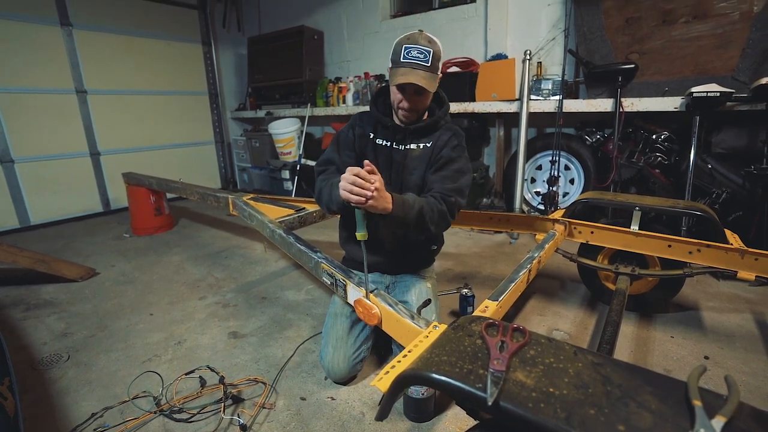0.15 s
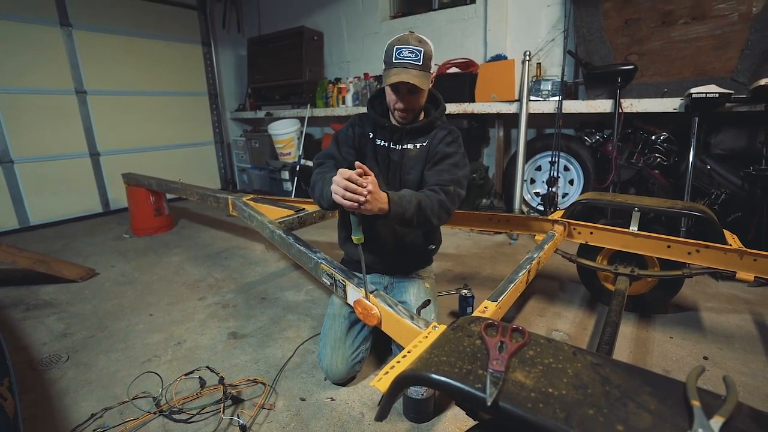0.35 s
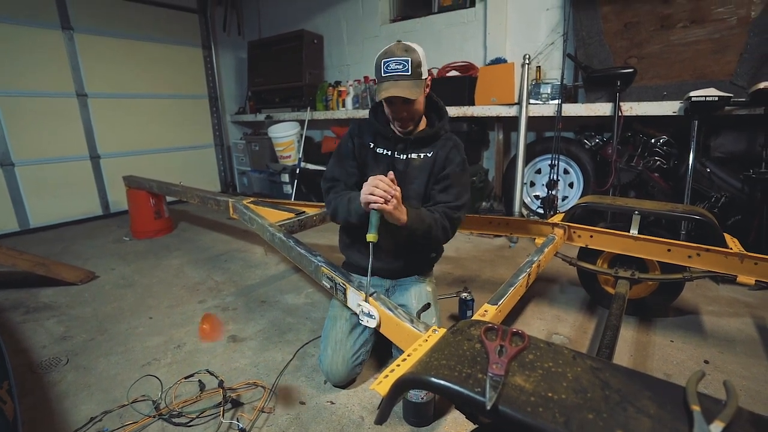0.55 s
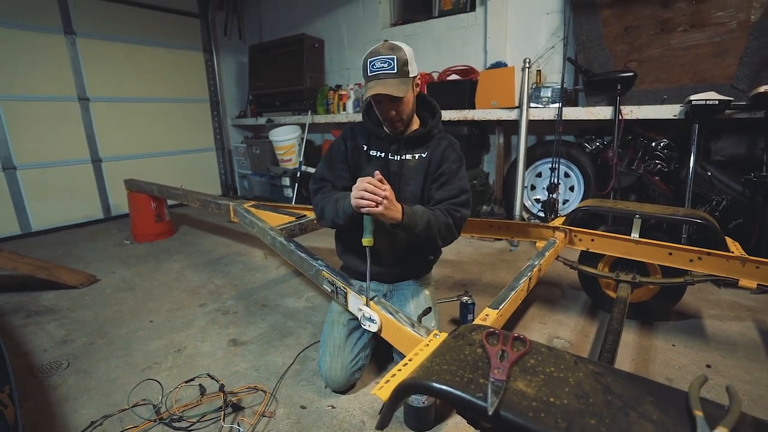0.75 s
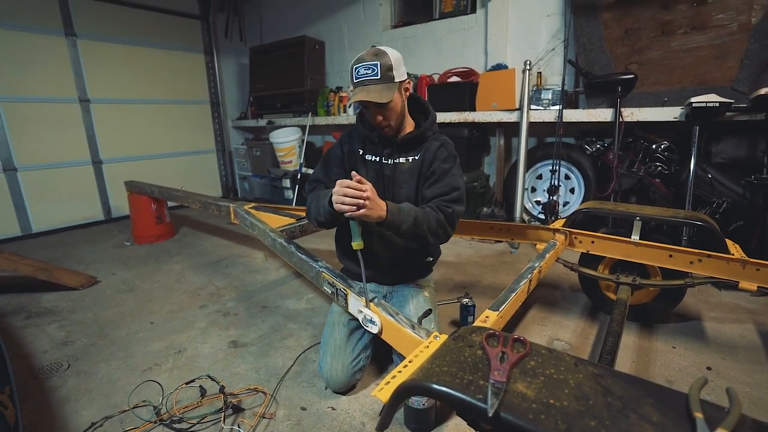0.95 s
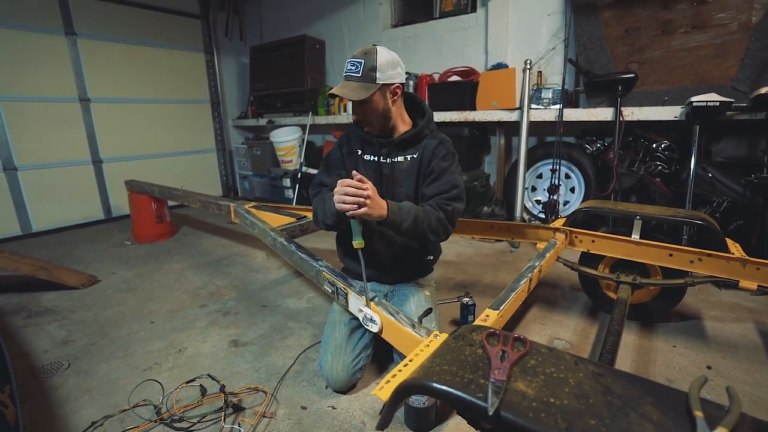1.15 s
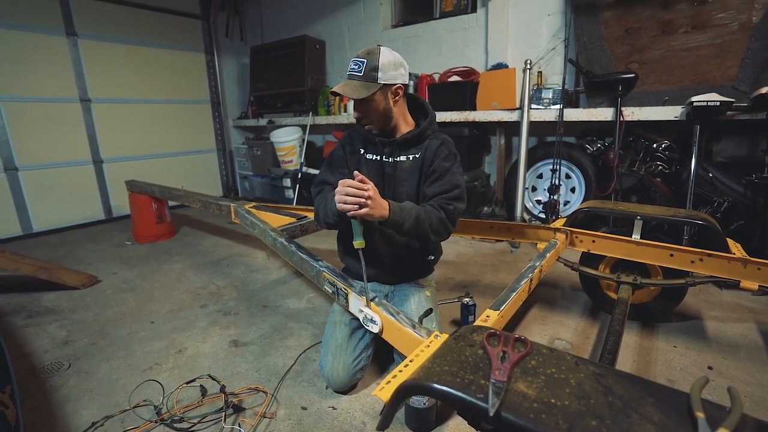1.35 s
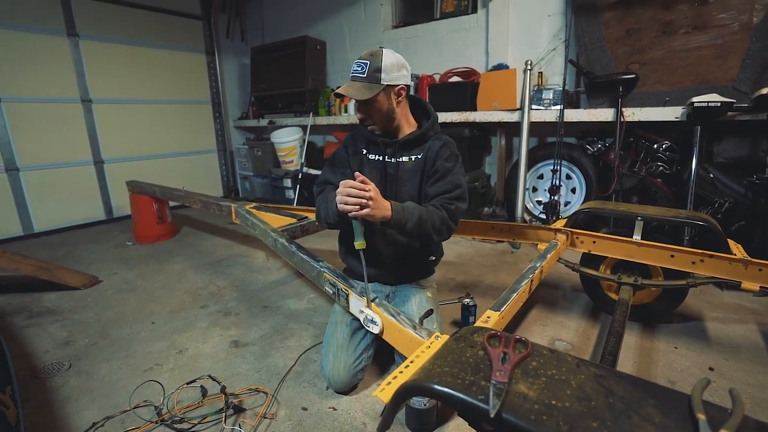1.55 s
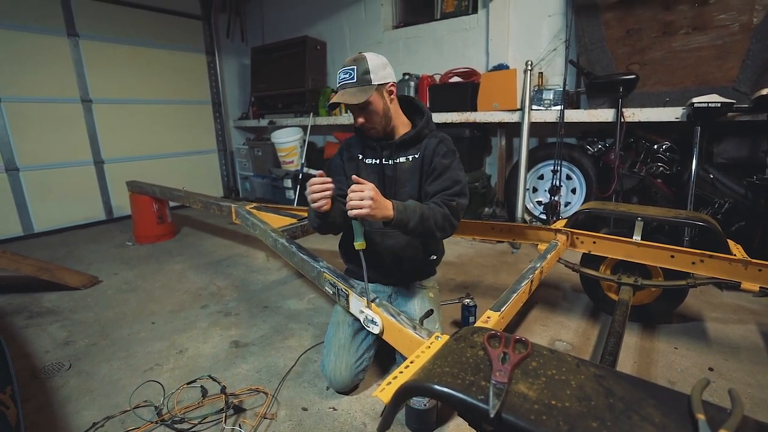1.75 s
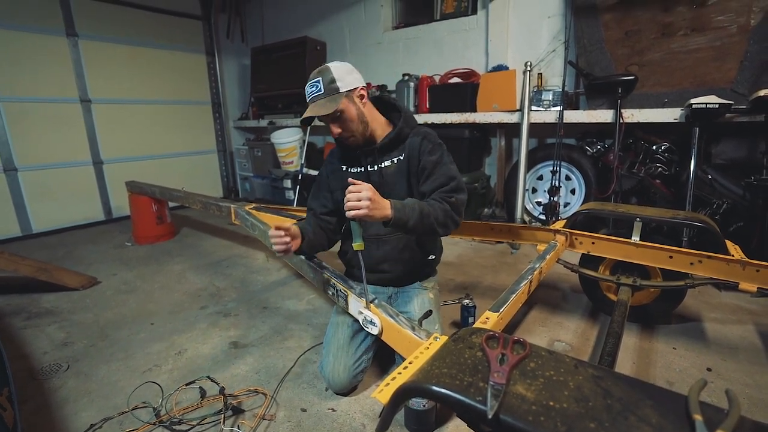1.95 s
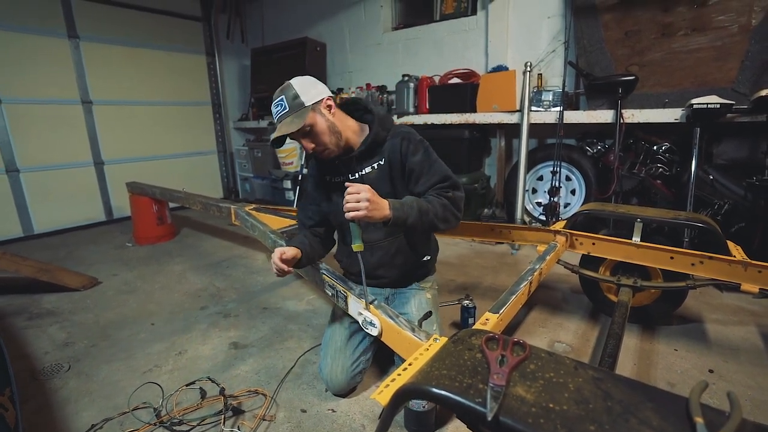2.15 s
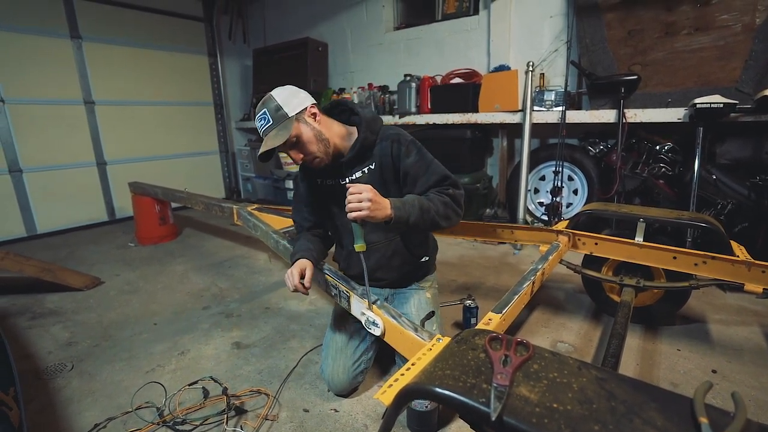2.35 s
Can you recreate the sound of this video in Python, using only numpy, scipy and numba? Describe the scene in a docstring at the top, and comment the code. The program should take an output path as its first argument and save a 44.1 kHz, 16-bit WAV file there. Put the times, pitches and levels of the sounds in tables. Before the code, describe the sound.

Plastic cracks as it is pried off ringing steel, then clatters and rolls on concrete.

```python
"""In a garage, a screwdriver levers a plastic lamp lens off a steel trailer frame.
First the lens cracks and scrapes in its seat, then it snaps free, and each crack makes the steel ring.
Next it clatters onto the concrete and rolls away on its rim, rasping over grit and clinking.
Last, someone shifts with two soft bumps and a sleeve rustles.
All along, the hard room echoes over a faint rumble, and a limiter flattens the loud blows."""
import sys
import numpy as np
from scipy import signal
from scipy.fft import rfft, irfft
from scipy.io import wavfile
from numba import njit

SR = 44100
rng = np.random.default_rng(int(sys.argv[2]) if len(sys.argv) > 2 else 0)


def store_pcm(level_fs):
    """Save levels as 16-bit WAV."""
    pcm = np.round(np.clip(level_fs, -1, 1) * 32767).astype(np.int16)
    wavfile.write(sys.argv[1], SR, np.atleast_2d(pcm).T)


N = 109544

# Cracks of the lens (time [s], level [dB], bass [dB], treble [dB], frame ring [dB],
# snap pitch [Hz], snap level [dB], pitch near which the frame rings most [Hz])
CRACKS = [(.0045, 6.5, -7.5, -7, -16.5, 1750, 11.5, 1500), (0.0247, 6, 3, -4.5, -13.5, 7500, 7, 750),
          (.2185, 3, -4, -9, -16, 1610, -10, 1200), (0.2617, 4.5, 0.5, -5.5, -16, 3700, 4.5, 1000),
          (0.262, -10.5, -1, -4, -21.5, 7600, 0, 1400), (.4882, -1, -1.5, -10.5, -13.5, 1750, -3.5, 1230),
          (0.496, -11.5, 0, 2, -39, 8100, -13, 800), (.527, 3, 3.5, -4, -5, 600, 7.5, 990),
          (0.5289, -25, -1, -4, -23, 2260, 7.5, 2500)]
# Tone of a crack (frequency [Hz], level [dB])
CRACK_TONE = [(60, -35.5), (130, -5.5), (230, -14), (500, -0.5), (1300, 8.5), (3100, 1), (8200, 2),
              (9800, -9.5), (15500, -21.5)]
# Notes of the steel frame (pitch [Hz], level [dB], ring time [s]); a ring time is a fall of 60 dB
FRAME_NOTES = [(143.7, -10, 0.9), (732, 7.5, 0.29), (842.5, 3, .4), (955.3, 1, 0.35), (990, 6.5, .33),
               (1234, 9, 0.28), (1417, -4.5, 0.45), (1750, 14.5, 0.12), (2540, 4, 0.33)]
# The blade's scrape (time [s], level [dB])
SCRAPE_LEVELS = [(.173, -23.5), (.181, -17.5), (.195, -10.5), (.219, -8.5), (.226, -33)]
# Tone of the scrape (frequency [Hz], level [dB])
SCRAPE_TONE = [(200, -12), (1700, 9.5), (8500, 7.5), (15500, -3)]
# The lens hits the floor (time [s], shell ring [dB], sharp tick [dB], low knock [dB])
BOUNCES = [(0.759, -3.5, -7.5, -6), (0.7737, -29, -4, -6.5), (0.791, -16, 1.5, -4.5),
           (0.8034, -20, -0.5, -6), (0.8152, -27, -6, -14.5), (0.8308, 0, 1, -28), (0.8427, 13, -1.5, -32),
           (0.896, 3.5, -4, -10), (0.946, -4, -34, -26.5), (1.072, -7, -33, -14.5), (1.167, -3.5, -41, -44),
           (1.179, -12.5, -38, -24.5), (1.4206, -16, -31, -28), (1.446, -20, -38, -38),
           (1.637, -27, -27, -55), (1.778, -25, -25.5, -54), (1.891, -12.5, -18, -38),
           (1.995, -19.5, -18, -66)]
# Tone of a tick (frequency [Hz], level [dB])
TICK_TONE = [(300, -45), (1200, 6.5), (4500, -0.5), (7500, 8), (9000, 8), (9800, -2.5), (11500, 2),
             (15500, -7.5)]
# Tone of a knock (frequency [Hz], level [dB])
KNOCK_TONE = [(60, -34), (135, -5.5), (220, -15.5), (400, -10.5), (650, -10), (730, 5.5), (840, -2.5),
              (3000, 7), (6000, -17)]
# Notes of the lens shell (pitch [Hz], width [Hz], level [dB])
SHELL_NOTES = [(1370, 377, -8), (2200, 240, 0), (2560, 168, 3.5), (2853, 434, 1.5), (3340, 213, 6),
               (3772, 184, 6), (4637, 257, 0), (5480, 580, -3.5), (6660, 510, -4), (8980, 780, -15)]
# The edge of the lens clinks on the floor (time [s], pitch [Hz], level [dB])
CLINKS = [(1.168, 4810, -20.5), (1.894, 4560, -24.5), (1.997, 4920, -29)]
# The roll over the concrete (time [s], rasp [dB], rim ring [dB])
ROLL_LEVELS = [(.845, -52, -23), (1.03, -32.5, -36.5), (1.22, -23, -30.5), (1.32, -33, -34),
               (1.46, -23.5, -33.5), (1.57, -33, -38), (1.62, -30, -31.5), (1.83, -36.5, -33.5),
               (2.02, -37, -46.5), (2.182, -40.5, -48.5), (2.238, -59, -57)]
# Notes of the rim (pitch [Hz], width [Hz], level [dB])
RIM_NOTES = [(768, 39, -7.5), (1389, 38, 3.5), (2186, 96, 11.5), (3319, 94, 6)]
# Sound coming straight from the lens, fading as it moves off (time [s], level [dB])
DIRECT_LEVELS = [(.76, -14.5), (0.772, -1), (.92, -29.5)]
# Soft bumps (time [s], level [dB], ring time [s], brightness [dB])
BUMPS = [(2.103, -47.5, 0.23, -8.5), (2.43, -52, 0.96, -1)]
# Tone of a bump (frequency [Hz], level [dB])
BUMP_TONE = [(40, -41), (125, 4.5), (220, -11), (1500, -8.5), (5000, -33)]
# The sleeve's rustle (time [s], level [dB])
RUSTLE_LEVELS = [(2.199, -53), (2.3, -47.5), (2.39, -69.5), (2.48, -49.5)]
# Tone of the rustle (frequency [Hz], level [dB])
RUSTLE_TONE = [(400, -12), (4000, 0), (12000, -30.5)]
# How long the garage echoes (frequency [Hz], ring time [s])
ECHO_TIMES = [(125, 0.48), (400, 0.43), (1000, 0.41), (5000, 0.36), (8000, 0.28)]
# Tone of the room's rumble and hiss (frequency [Hz], level [dB])
RUMBLE_TONE = [(15, -4), (28, 0), (45, -14), (80, -22), (300, -31), (1500, -35), (6000, -48),
               (15000, -64)]

CRACK_RING_S = 0.032
SLIPS_PER_S, GRIT_PER_S = 4700, 1500
FILTER_HZ = np.fft.rfftfreq(4096, 1 / SR)


def prying():
    """The plastic gives way in sharp cracks, each a short burst of noise."""
    cracks = place((s, amp(db) * bass_treble(burst(CRACK_RING_S), bass, treble))
                   for s, db, bass, treble, *_ in CRACKS)
    return shape_tone(cracks, CRACK_TONE)


def snaps():
    """The part that gives way rings briefly at its own pitch, from a bright snap to a low clunk."""
    return place((s, amp(db) * resonate(burst(CRACK_RING_S), [(hz, hz / 4, 0)]))
                 for s, *_, hz, db, _ in CRACKS)


def steel_frame(build_s=0.034, spread_octaves=0.63, off_pitch_db=-14.5):
    """Each crack spreads through the steel and sets its notes ringing, mostly those near one pitch."""
    t = np.arange(SR) / SR
    hz, db, ring_s = np.array(FRAME_NOTES).T[:, :, None]
    notes = amp(db) * np.sin(2 * np.pi * hz * t) * fade(t, ring_s) * (1 - np.exp(-t / build_s))
    rings = []
    for s, _, _, _, ring_db, _, _, centre_hz in CRACKS:
        nearness = np.exp(-(np.log2(hz / centre_hz) / spread_octaves) ** 2)
        share = amp(off_pitch_db * (1 - nearness))
        rings.append((s, amp(ring_db) * np.sum(share * notes, axis=0)))
    return place(rings)


def falling_lens(slowed_at_s=.87, dull_hz=8500):
    """Each bounce ticks, knocks and rings the shell; the ticks turn duller once the lens has slowed."""
    blows = place((s, amp(db) * burst(ring_s=0.006)) for s, db, _, _ in BOUNCES)
    ticks = place((s, amp(db) * burst(ring_s=0.009)) for s, _, db, _ in BOUNCES)
    knocks = place((s, amp(db) * burst(ring_s=0.025)) for s, _, _, db in BOUNCES)
    ticks = shape_tone(ticks, TICK_TONE)
    dull_ticks = signal.lfilter(*signal.butter(2, dull_hz, fs=SR), ticks)
    ticks = np.where(np.arange(N) / SR > slowed_at_s, dull_ticks, ticks)
    return resonate(blows, SHELL_NOTES) + ticks + shape_tone(knocks, KNOCK_TONE)


def scraping():
    """The blade sticks and slips along the seat of the lens."""
    return shape_tone(grains(SLIPS_PER_S, SCRAPE_LEVELS, spread_db=2), SCRAPE_TONE)


def rolling_lens():
    """Grit under the rim makes the shell rasp and the rim sing."""
    shell_grit = grains(GRIT_PER_S, [(s, db) for s, db, _ in ROLL_LEVELS], spread_db=3)
    rim_grit = grains(GRIT_PER_S, [(s, db) for s, _, db in ROLL_LEVELS], spread_db=3)
    rasp = bass_treble(resonate(shell_grit, SHELL_NOTES), bass_db=2.5, treble_db=-8)
    return rasp + resonate(rim_grit, RIM_NOTES)


def clinks(width_hz=120):
    """A blow on the edge of the lens rings one high note."""
    return place((s, amp(db) * resonate(burst(ring_s=.03), [(hz, width_hz, 0)])) for s, hz, db in CLINKS)


def bumps():
    """Someone shifts and bumps softly against the frame and floor."""
    thuds = place((s, amp(db) * bass_treble(burst(ring_s), -bright / 2, bright))
                  for s, db, ring_s, bright in BUMPS)
    return shape_tone(thuds, BUMP_TONE)


def rustle():
    """Cloth slides over cloth as an arm reaches out."""
    return shape_tone(grains(SLIPS_PER_S, RUSTLE_LEVELS, spread_db=3), RUSTLE_TONE)


def garage(x, build_s, move_s=.16):
    """Echoes off the concrete and door: the treble dies first, and the pattern shifts as things move."""
    t, hz = np.arange(SR) / SR, np.fft.rfftfreq(SR, 1 / SR)
    bands = np.array([read_curve(hz, [(f, f == centre) for f, _ in ECHO_TIMES])
                      for centre, _ in ECHO_TIMES])
    fades = np.array([fade(t, ring_s) for _, ring_s in ECHO_TIMES]) * (1 - np.exp(-t / build_s))
    step, echoes = int(move_s * SR), []
    for i in range(0, N, step):  # each overlapping slice gets its own random echo
        noise_bands = irfft(rfft(rng.standard_normal(SR)) * bands, SR)
        tail = np.sum(noise_bands * fades, axis=0)
        span = np.arange(max(i - step, 0), min(i + step, N))
        part = x[span] * np.cos(np.pi / 2 * (span - i) / step)
        echoes.append((span[0] / SR, signal.fftconvolve(part, tail / np.linalg.norm(tail))))
    return place(echoes)


def room_rumble():
    """A steady low rumble with a faint hiss."""
    return amp(-48) * unit(shape_tone(rng.standard_normal(N), RUMBLE_TONE))


def amp(db):
    """Turn decibels into a multiplier."""
    return 10 ** (np.asarray(db) / 20)


def unit(x):
    """Scale x to an average power of one."""
    return x / np.sqrt(np.mean(x ** 2))


def fade(t, ring_s):
    """A smooth fall of 60 dB every ring_s seconds."""
    return np.exp(-np.log(1000) * t / ring_s)


def burst(ring_s):
    """One contact: noise that dies away, about equally strong at all frequencies."""
    level = fade(np.arange(SR // 2) / SR, ring_s)
    spectrum = rfft(rng.standard_normal(len(level)) * level)
    even_noise = irfft(spectrum / np.abs(spectrum), len(level))
    return unit(even_noise * np.sqrt(level)) * np.sqrt(np.mean(level ** 2))


def grains(per_s, levels, spread_db):
    """Tiny random hits that follow (time [s], level [dB]) points."""
    hits = (rng.random(N) < per_s / SR) * rng.choice([-1, 1], N)
    hits = hits * amp(spread_db * rng.standard_normal(N))
    s, db = np.array(levels, float).T
    t = np.arange(N) / SR
    return unit(hits) * amp(np.interp(t, s, db)) * (t >= s[0]) * (t <= s[-1])


def place(events):
    """Lay (time [s], sound) pairs on the time line."""
    out = np.zeros(N)
    for s, x in events:
        i = int(np.clip(s * SR, 0, N - 1))
        out[i:i + len(x)] += x[:N - i]
    return out


def resonate(x, notes):
    """Let x ring the given notes; narrower ones ring longer."""
    click = signal.unit_impulse(SR // 5)
    ring = sum((-1) ** k * amp(db) * signal.lfilter(*signal.iirpeak(hz, hz / width, SR), click)
               for k, (hz, width, db) in enumerate(notes))
    return signal.fftconvolve(x, ring / np.linalg.norm(ring))[:N]


def read_curve(hz, points):
    """Read between (frequency [Hz], value) points, with octaves evenly spaced."""
    f, values = np.array(points, float).T
    return np.interp(np.log(np.maximum(hz, 1)), np.log(f), values)


def shape_tone(x, tone):
    """Give x a tone, with a filter whose average power gain is one."""
    return equalise(x, unit(amp(read_curve(FILTER_HZ, tone))))


def bass_treble(x, bass_db, treble_db):
    """Turn the lows and highs up or down, leaving the middle alone."""
    tone = [(600, bass_db), (1400, 0), (2300, 0), (6000, treble_db)]
    return equalise(x, amp(read_curve(FILTER_HZ, tone)))


def equalise(x, gain):
    """Scale each frequency by its gain, with no ringing ahead of a hit."""
    log_response = irfft(np.log(gain))
    half = len(log_response) // 2
    log_response[1:half] *= 2  # move the part before the hit to after it
    log_response[half + 1:] = 0
    return signal.fftconvolve(x, irfft(np.exp(rfft(log_response))))[:len(x)]


@njit
def follow_level(x, rise_s, fall_s):
    """Track how loud x is, rising and falling at separate speeds."""
    rise, fall = 1 / (rise_s * SR), 1 / (fall_s * SR)
    out, level = np.empty(len(x)), 0.
    for i in range(len(x)):
        level += (abs(x[i]) - level) * (rise if abs(x[i]) > level else fall)
        out[i] = level
    return out


def scene():
    """The work close by and the lens further off, each with its echo, over the rumble."""
    near = prying() + bumps() + rustle()
    snap_and_scrape = snaps() + scraping()
    lens = falling_lens() + clinks() + rolling_lens()
    direct_gain = amp(np.interp(np.arange(N) / SR, *np.array(DIRECT_LEVELS).T))
    direct_lens = direct_gain * bass_treble(lens, bass_db=11.5, treble_db=9.5)
    into_room = near + amp(-8.5) * snap_and_scrape  # these two stir the room less
    echoes = amp(2) * garage(into_room, build_s=0.0076) + amp(1.5) * garage(lens, build_s=0.0012)
    return (near + snap_and_scrape + direct_lens + steel_frame() + echoes + room_rumble())[None]


def record(dry, limit_db=-10.5, ratio=10, top_hz=15800):
    """A fast limiter turns loud blows down; the very start of a crack slips through and clips."""
    level = follow_level(dry[0], rise_s=0.0018, fall_s=0.015)
    gain = np.minimum(1, amp(limit_db) / (level + 1e-9)) ** (1 - 1 / ratio)
    treble_cut = signal.ellip(8, .2, 60, top_hz, fs=SR, output="sos")
    return signal.sosfilt(treble_cut, np.clip(dry * gain, -1, 1))


dry = scene()
out = record(dry)
store_pcm(out)
```